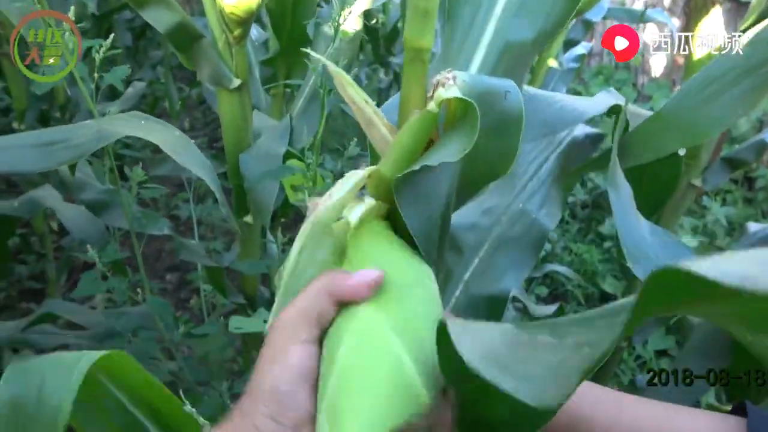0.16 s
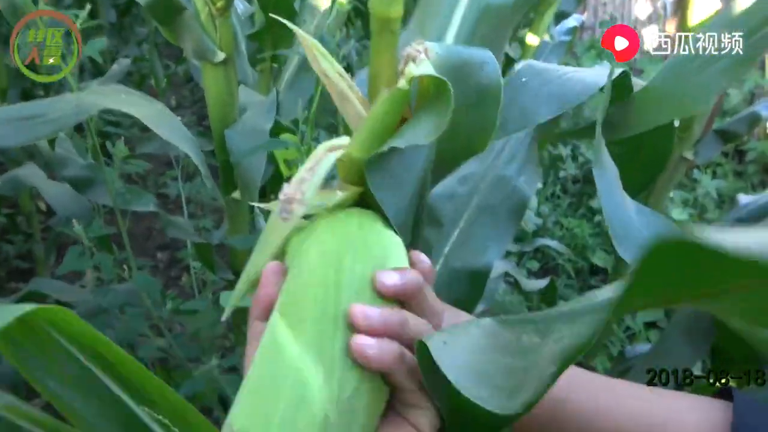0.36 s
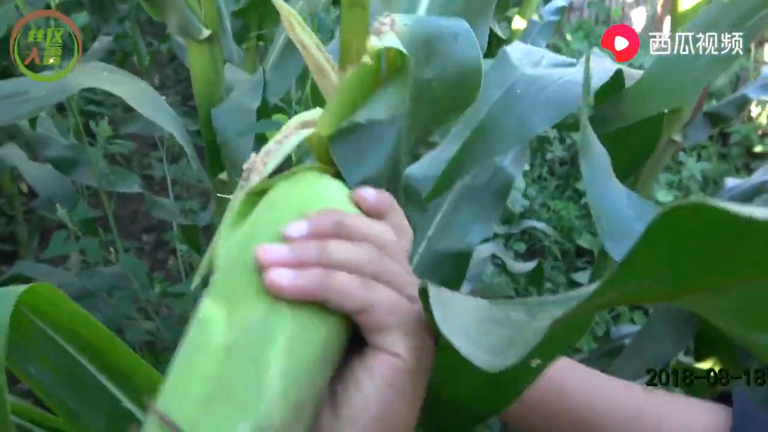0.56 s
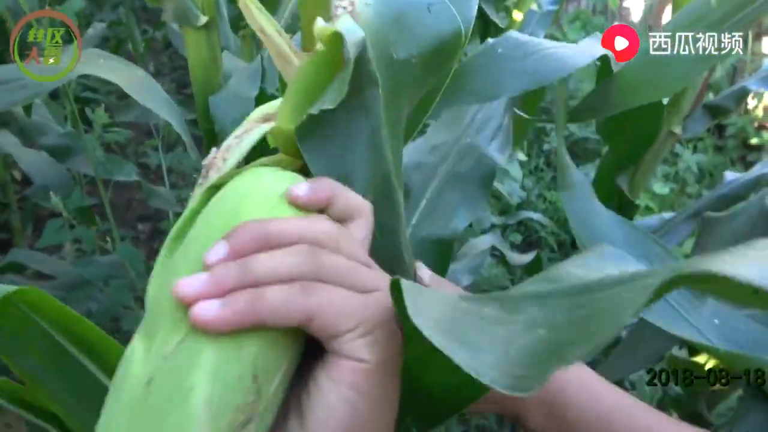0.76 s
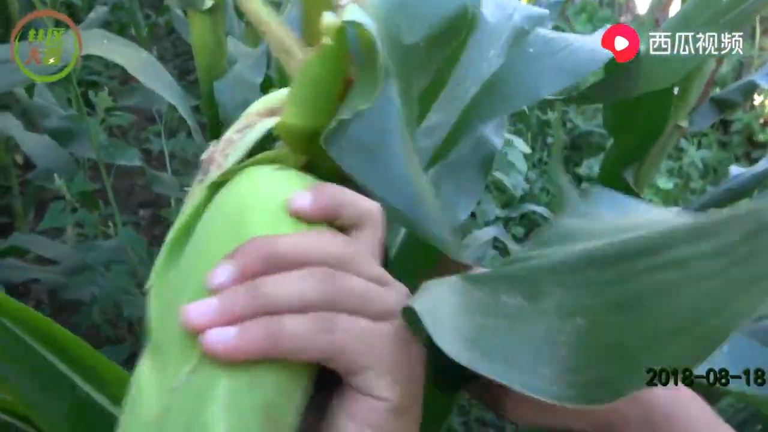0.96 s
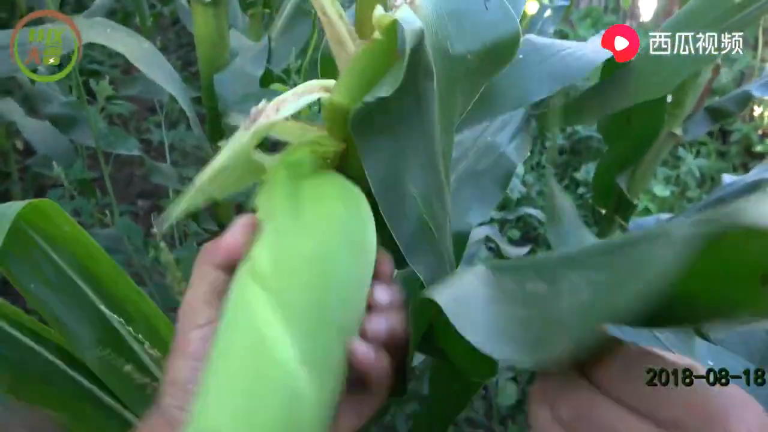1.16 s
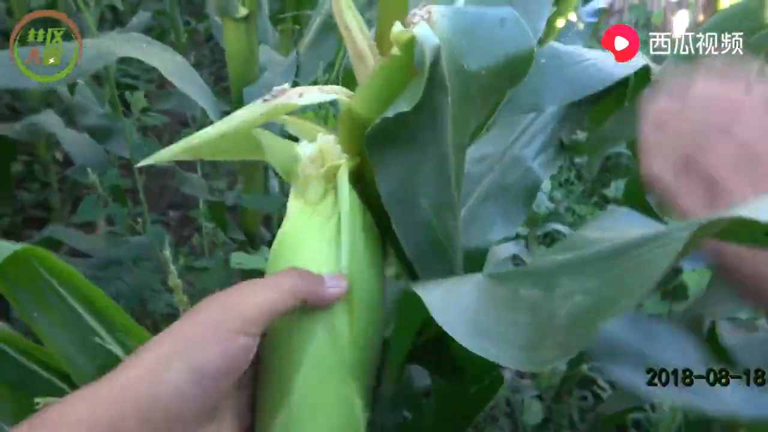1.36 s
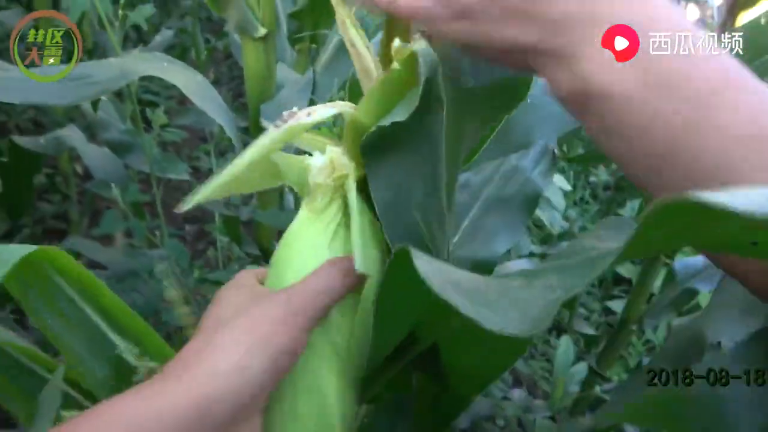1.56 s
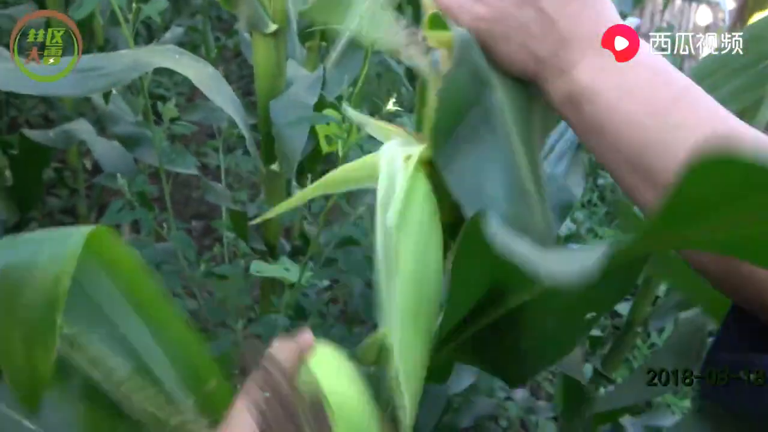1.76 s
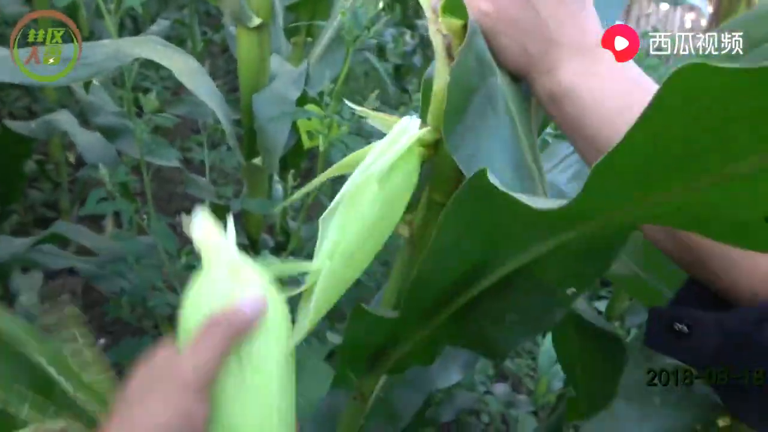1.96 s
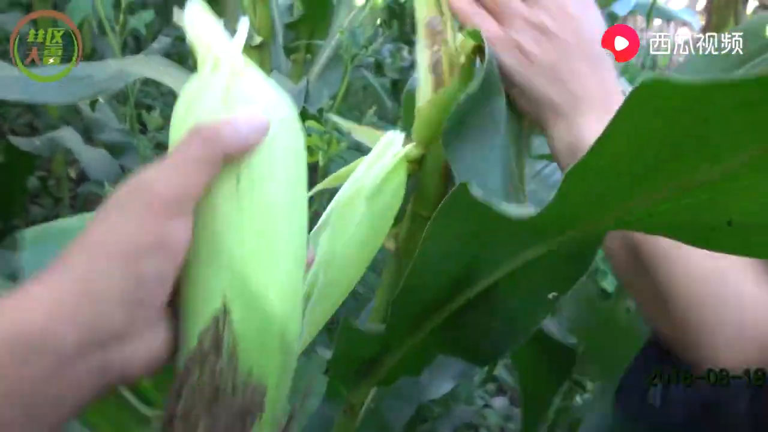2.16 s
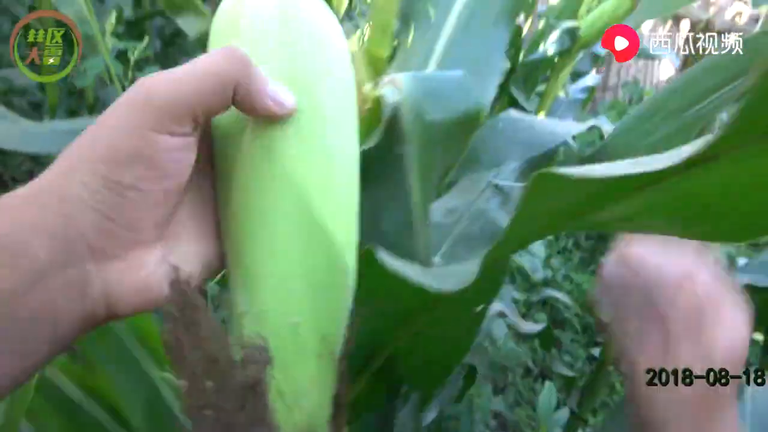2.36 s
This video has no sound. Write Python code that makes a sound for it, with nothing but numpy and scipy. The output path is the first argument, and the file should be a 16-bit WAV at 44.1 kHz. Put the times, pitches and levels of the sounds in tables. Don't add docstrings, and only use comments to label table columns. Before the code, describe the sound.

An ear of corn is torn off its stalk by hand, fibres snapping and leaves rustling

```python
import sys
import numpy as np
from scipy import signal
from scipy.fft import rfft, irfft
from scipy.io import wavfile
from scipy.ndimage import uniform_filter1d

SR = 44100
rng = np.random.default_rng(int(sys.argv[2]) if len(sys.argv) > 2 else 0)


def wav_record(signal):
    frames = np.transpose(np.atleast_2d(signal))
    bounded = np.clip(frames, -1, 1)
    quanta = np.round(bounded * 32767).astype(np.int16)
    wavfile.write(sys.argv[1], SR, quanta)


def gain_from_db(level_db):
    decades = np.asarray(level_db, float) / 20
    return 10 ** decades


N = 107118

# (frequency [Hz], level per Hz [dB])
LEAF = [(120, -50), (200, -1.5), (289, -1), (432, -13.5), (1300, -4.5), (1450, -1.5), (6170, -6),
        (10700, -12), (16000, -26)]


def evened(x):
    return x / np.sqrt(np.mean(x ** 2) + 1e-20)


def read(points, hz):
    f, value = np.transpose(points)
    return np.interp(np.log(hz + 1), np.log(f + 1), value, right=value[-1] - 12)


def colour(x, points, scale=1):
    gain = gain_from_db(scale * read(points, np.fft.rfftfreq(len(x), 1 / SR)))
    return irfft(rfft(x) * gain, len(x))


def add(mix, s, sound):
    part = mix[max(round(s * SR), 0):][:len(sound)]
    part += sound[:len(part)]


def ring(x, hz, q):
    return signal.lfilter(*signal.iirpeak(min(hz, SR / 2.5), q, SR), x)


def ring_twice(x, hz, q):
    return ring(ring(x, hz, q), hz, q)


def wander(shape, size):
    x = rng.standard_normal(shape)
    for axis, count in enumerate(size):
        for _ in range(2):
            x = uniform_filter1d(x, count, axis=axis)
    return evened(x)


def air():
    # (frequency [Hz], level per Hz [dB])
    rumble_colour = [(12, -41), (20, -17), (59, 2), (183, -6), (215, -15.5), (277, -4.5), (524, -20.5),
                     (900, -18), (1170, -118), (1980, -120)]
    rumble_db, lump_db = -48.5, 1
    start_db, settle_s = -8, 0.2
    hum_hz, hum_db = 49.6, -61
    t = np.arange(N) / SR
    lumps = lump_db * wander((N,), size=(1500,)) + start_db / (1 + (t / settle_s) ** 4)
    cycles = hum_hz * np.cumsum(1 + 0.076 * wander((N,), size=(3000,))) / SR
    drone = gain_from_db(hum_db) * np.sin(2 * np.pi * cycles)
    rumble = evened(colour(rng.standard_normal(N), rumble_colour + [(2500, -60)]))
    return gain_from_db(rumble_db + lumps) * rumble + drone


def garden_hiss(db):
    # (frequency [Hz], level per Hz [dB])
    hiss_colour = [(30, -13), (250, -0.5), (900, 7), (2000, 10.5), (3500, -28), (5700, 8), (9000, 4.5),
                   (16000, -12.5)]
    return gain_from_db(db) * evened(colour(rng.standard_normal(N), hiss_colour))


def grains(spread_db):
    grains_per_s, grain_cycles, hiss_db = 3300, 6.4, 2
    sizes = gain_from_db(spread_db * np.minimum(rng.exponential(1, N), 5))
    sizes = sizes * (rng.random(N) < grains_per_s / SR)
    kind = rng.integers(0, 24, N)
    t, out = np.arange(400) / SR, np.zeros(N)
    for k, hz in enumerate(np.geomspace(500, 15000, num=24)):
        click = np.sin(2 * np.pi * hz * t) * hz * t * np.exp(-hz * t / grain_cycles * 2)
        click = click * np.sqrt(hz) / np.linalg.norm(click)
        out += signal.oaconvolve(sizes * (kind == k), click)[:N]
    level = uniform_filter1d(abs(rfft(out)) ** 2, size=800) ** .5
    flat = evened(irfft(rfft(out) / (level + 1e-9), N))
    return flat + gain_from_db(hiss_db) * rng.standard_normal(N)


def rustle():
    # (time [s], rustle level [dB], brightness [-1 to 1])
    effort = [(0, -44.5, -0.035), (.1, -35, -0.038), (.27, -30, 0.17), (.42, -31, -0.18),
              (.475, -38, -0.76), (.62, -33.5, 0.25), (.73, -38, -0.42), (.88, -41, -0.5),
              (1.03, -40, -0.26), (1.1, -32, -0.09), (1.28, -32.5, 0.019), (1.44, -35.5, 0.25),
              (1.5, -38, -0.091), (1.65, -39, -0.3), (1.832, -31.5, -0.13), (2.0, -35.5, -0.63),
              (2.13, -41.5, -0.88), (2.43, -37.5, -0.41)]
    tilt_db, pivot_hz = 4, 3000
    patch_db, flicker_db = 0.5, 1
    hz, t, z = signal.stft(grains(spread_db=2.5), SR, nperseg=256, noverlap=192)
    s, db, bright = np.transpose(effort)
    tilt = tilt_db * np.log2((hz[:, None] + 200) / pivot_hz) * np.interp(t, s, bright)
    patches = patch_db * wander(z.shape, size=(6, 14))
    flicker = flicker_db * wander((1, len(t)), size=(1, 8))
    shape = read(LEAF, hz)[:, None] + tilt
    shape = shape - 10 * np.log10(np.mean(gain_from_db(2 * shape), axis=0))
    gain = gain_from_db(shape + patches + flicker + np.interp(t, s, db))
    return signal.istft(z * gain, SR, nperseg=256, noverlap=192)[1][:N]


def husk_grains():
    return colour(grains(spread_db=3.8), LEAF)


def scrapes():
    # (centre [s], length [s], level [dB], husk ring [Hz])
    slides = [(0.306, 0.035, -35, 2240), (0.335, 0.037, -28.5, 2480), (0.408, 0.013, -39, 3000),
              (.497, 0.011, -35.5, 5940), (.535, 0.029, -31, 2390), (0.556, 0.033, -36.5, 5370),
              (0.632, 0.032, -34.5, 1800), (0.777, 0.052, -34, 3000), (1.074, 0.0098, -28, 5000),
              (1.104, 0.024, -35, 6300), (1.143, .02, -42, 2500), (1.206, 0.06, -35, 2540),
              (1.356, 0.02, -27.5, 4370), (1.407, 0.065, -33, 3940), (1.49, 0.019, -49, 1100),
              (1.726, 0.017, -28.5, 2900), (1.738, 0.02, -33, 745), (1.741, .025, -22.5, 1290),
              (1.755, 0.036, -25.5, 6540), (1.855, 0.043, -34, 3120), (1.972, 0.04, -34.5, 790),
              (1.943, 0.017, -32.5, 600), (2.103, 0.026, -39, 3500), (2.14, 0.021, -42, 1130),
              (2.246, 0.037, -41.5, 12200), (2.197, 0.13, -43, 12800), (1.893, 0.2, -51, 13000),
              (1.713, 0.0083, -33, 1490), (2.368, 0.11, -37, 7200)]
    ring_q, wide_db = 0.7, 0
    stream, out = husk_grains(), np.zeros(N)
    for s, length, db, hz in slides:
        x = stream[int(s * SR * .9):][:int(2 * length * SR)]
        rub = evened(ring_twice(x, hz, ring_q)) + gain_from_db(wide_db) * evened(x)
        add(out, s - length, gain_from_db(db) * np.hanning(len(x)) * rub)
    return out


def squeaks():
    # (centre [s], length [s], level [dB], pitch [Hz])
    rubs = [(0.313, .008, -25, 2320), (0.33, .012, -28, 2400), (.352, .01, -32, 2950),
            (1.355, 0.017, -23, 2400), (1.356, 0.0097, -27, 4280), (1.357, .01, -30, 5800),
            (1.421, 0.075, -34.5, 2160), (1.592, 0.021, -38, 4380), (1.754, 0.0082, -19, 1500),
            (1.762, .016, -26.5, 6600), (2.089, 0.028, -37, 3980), (2.093, .02, -46, 6800)]
    stream, out = husk_grains(), np.zeros(N)
    for s, length, db, hz in rubs:
        x = stream[int(s * SR * .8):][:int(2 * length * SR)]
        add(out, s - length, gain_from_db(db) * np.hanning(len(x)) * evened(ring_twice(x, hz, q=7.2)))
    return out


def thumps():
    # (time [s], level [dB], pitch [Hz], time to fade by 60 dB [s])
    knocks = [(0.368, -31, 347, 0.091), (0.408, -13, 66.3, 0.038), (0.436, -21, 69.4, 0.11),
              (0.471, -24, 94, .1), (0.498, -29, 275, 0.037), (0.531, -26.5, 388, 0.057),
              (0.546, -22.5, 71, 0.048), (.762, -31, 158, 0.055), (0.789, -23, 374, 0.035),
              (1.006, -16.5, 440, 0.012), (1.149, -22.5, 107, 0.046), (1.151, -27, 262, 0.025),
              (1.494, -28, 131, 0.054), (1.737, -27.5, 137, 0.078), (1.768, -23, 327, 0.059),
              (1.891, -18, 154, 0.027), (1.965, -21, 653, 0.056), (2.122, -37.5, 64, 0.52),
              (2.175, -25, 593, 0.013)]
    t, out = np.arange(SR // 3) / SR, np.zeros(N)
    for s, db, hz, t60 in knocks:
        swell = 1 - np.exp(-t * hz * 2)
        tone = np.sin(2 * np.pi * hz * t * (1 - .5 * t))
        add(out, s, gain_from_db(db - 60 * t / t60) * swell * tone)
    return out


def snaps():
    # (time [s], peak level [dB], ring [Hz], tick level over the ring [dB])
    big_snaps = [(.1187, -5.5, 2160, -6), (.2848, 0.5, 2700, -14), (.3025, 0, 5250, -23),
                 (.3495, 2, 2880, -3), (.363, -2, 3400, -21), (.368, 0, 1040, -1), (.383, -6, 2860, -0.5),
                 (.4945, -9, 6200, 8.5), (.4995, -2.5, 1510, -2), (.5186, 1.5, 3500, -7),
                 (.5325, 1, 5700, -13), (.5525, 2, 5250, -28), (.6025, -6, 3120, 0.5),
                 (.7625, 3, 1720, -2.5), (.7655, -5.5, 1390, -18), (.7915, -8, 950, 5.5),
                 (.8975, -0.5, 3500, -34), (.9625, -5.5, 7400, -3), (.982, -4.5, 3400, -16),
                 (1.006, -1, 2320, -2.5), (1.053, -3, 3570, -8), (1.153, -8.5, 2430, 9.5),
                 (1.352, -7, 2460, -1), (1.7405, -0.5, 845, -10), (1.7705, -1, 1200, -1.5),
                 (1.7905, -7, 2400, -7)]
    # (time [s], peak level [dB],
    # ring [Hz], tick level over the ring [dB])
    small_snaps = [(0.7741, -27, 2420, -14), (0.7855, -8, 4500, -7), (0.8357, -13, 1490, -3),
                   (1.074, -17, 6600, -12), (1.489, -9, 1120, -12), (1.7096, -5, 1400, -1),
                   (1.748, -4.5, 1470, -9), (2.0769, -6.5, 2020, -30), (2.103, -14.5, 3760, -23),
                   (2.133, -12, 1700, -24), (2.1447, -9, 2000, -31), (2.175, -6, 1270, -25),
                   (2.225, -11, 6000, -8), (2.271, -8, 5200, -10),
                   (0.17, -7.5, 2420, -4), (.2855, -3, 5200, -21), (.3635, -2, 7140, -17),
                (.377, -4, 4300, -15), (0.4102, -13, 1830, 3), (0.49, -5.5, 6500, -5),
                (.4935, -5, 6000, -3), (0.496, -3, 3200, -12), (0.5023, -4, 4000, -10),
                (.513, -11, 6300, -12), (0.53, -12, 6500, -10), (.5342, -4, 2280, -22),
                (.536, -16, 6800, -12), (.542, -4, 5400, -15), (.549, -8, 2200, -15),
                (1.0059, 2, 3430, -17), (1.0077, -3.5, 1250, -20), (0.8997, -5, 2980, -13),
                (1.1509, -9, 1340, 2), (0.467, -14, 5500, -8), (1.0098, -9, 2600, -15),
                (1.0661, -7, 1800, -15), (1.0785, -12, 3500, -8), (1.086, -10, 2500, -10),
                (1.5415, -18, 2080, -17), (1.6642, -10.5, 6500, -23), (1.702, -7, 1900, -1.5),
                (1.7413, -12, 1290, -20), (1.7565, -6, 7000, -9), (1.7706, -2, 6400, -17),
                (.631, -12, 8000, -10), (.757, -21, 5040, -8), (1.1, -15, 8000, -10),
                (2.094, -12.5, 2800, -18), (2.134, -14.5, 980, -25), (2.178, -14.5, 1610, -25),
                (2.2265, -5, 12500, -23), (.792, -12, 2980, 0), (1.489, -9, 2340, -8)]
    snap_db, top_hz = -10.5, 16400
    tick_hz, tick_rise_s, tick_t60_s = 7330, 0.00029, 0.0046
    ring_q, ring_t60_s, first_break = 1.5, 0.0034, 1.33
    second_ring, second_db = 1.96, -18.5
    after_db, after_t60_s = -13.5, 0.058
    t, out = np.arange(2000) / SR, np.zeros(N)
    for s, db, hz, tick_db in big_snaps + small_snaps:
        a, b, c = rng.standard_normal((3, len(t)))
        burst = a * np.minimum(t / tick_rise_s, 1) * gain_from_db(-60 * t / tick_t60_s)
        tick = ring_twice(burst, tick_hz, q=1.4)
        breaks = (t == 0) * first_break + b ** 3 * gain_from_db(-60 * t / ring_t60_s) / 2
        body = ring_twice(breaks, hz, ring_q)
        body = body + gain_from_db(second_db) * ring_twice(breaks, hz * second_ring, ring_q)
        bright_hiss = evened(colour(ring(c, tick_hz, 1), LEAF, scale=.5))
        hiss = evened(ring(c, hz, 1)) + gain_from_db(tick_db) * bright_hiss
        sound = body / abs(body).max() + gain_from_db(tick_db) * tick / abs(tick).max()
        sound = sound + gain_from_db(after_db - 60 * t / after_t60_s) * hiss
        add(out, s, gain_from_db(db + snap_db) * sound)
    return signal.lfilter(*signal.butter(1, top_hz, fs=SR), out)


def scattered(cracks):
    scatter_db, scatter_hz = -9.5, 4500
    echoes = rng.standard_normal(300) * gain_from_db(-60 * np.arange(300) / 300)
    treble = signal.lfilter(*signal.butter(2, scatter_hz, "high", fs=SR), cracks)
    return gain_from_db(scatter_db) * signal.oaconvolve(treble, echoes / np.linalg.norm(echoes))[:N]


def swing_left(mid):
    centre_s, width_s, swing_db, top_hz = 2.095, 0.15, -8, 3500
    swing = gain_from_db(swing_db) * np.exp(-((np.arange(N) / SR - centre_s) / width_s) ** 2)
    return swing * signal.lfilter(*signal.butter(2, top_hz, fs=SR), mid)


def scene():
    # (frequency [Hz], difference [dB])
    lean = [(60, .5), (150, .9), (300, 3.), (700, 1.2), (1500, .5), (3000, .05), (17000, .05)]
    cracks = snaps()
    mid = air() + garden_hiss(-52.5) + rustle() + scrapes() + squeaks() + thumps() + cracks
    side = garden_hiss(-43.5) + scattered(cracks) + swing_left(mid)
    return np.array([colour(mid, lean, scale=.5) + side, colour(mid, lean, scale=-.5) - side])


def top_cut(x):
    return signal.sosfilt(signal.butter(12, 16990, fs=SR, output="sos"), x)


def record(dry):
    edge_hz, fold_db, fold_chance_db = 15950, -11.5, 3
    lowpass = signal.firwin(301, edge_hz, window=("kaiser", 8), fs=SR)
    limited = signal.oaconvolve(dry, lowpass[None], "same")
    pair = np.array([limited.sum(0), limited[0] - limited[1]]) / 2
    mid, side = signal.stft(pair, nperseg=2048, noverlap=1024)[2]
    power = uniform_filter1d(abs(np.array([mid, side])) ** 2, size=40, axis=1)
    power = uniform_filter1d(power, size=2, axis=2)
    margin_db = 10 * np.log10(abs(power[1] / (power[0] + 1e-20)) + 1e-20) - fold_db
    margin_db = margin_db + fold_chance_db * wander(mid.shape, size=(20, 2))
    kept = 1 / (1 + gain_from_db(np.clip(-20 * margin_db, -200, 200)))
    kept[:40] = 1
    side = signal.istft(side * kept, nperseg=2048, noverlap=1024)[1][:N]
    return top_cut(limited.mean(0) + np.array([side, -side]))


dry = scene()
out = record(dry)
wav_record(out)
```